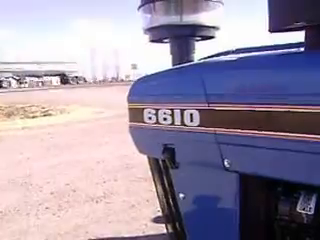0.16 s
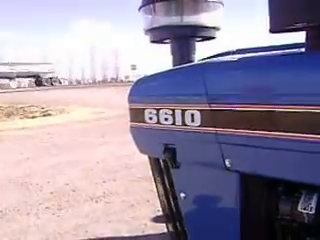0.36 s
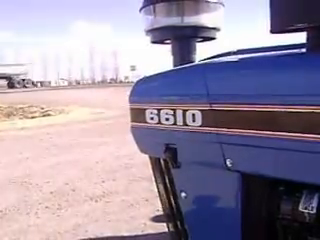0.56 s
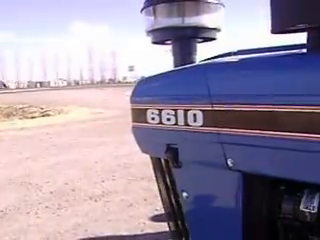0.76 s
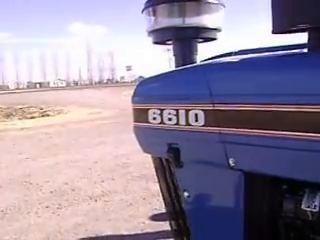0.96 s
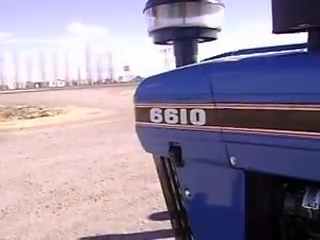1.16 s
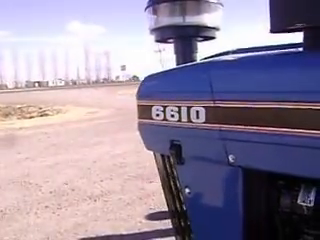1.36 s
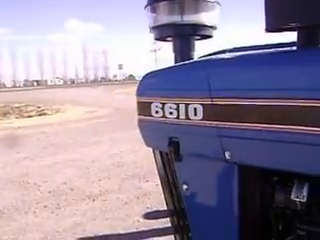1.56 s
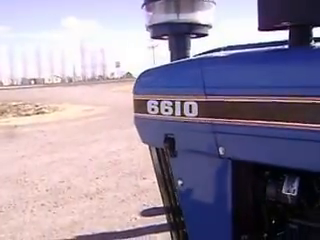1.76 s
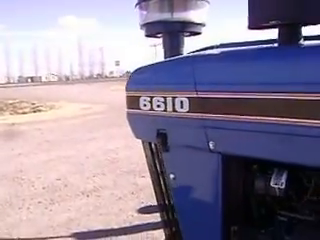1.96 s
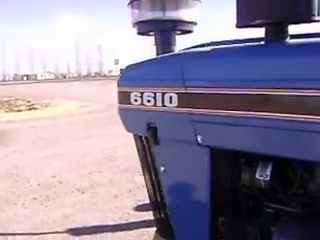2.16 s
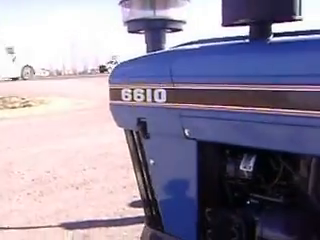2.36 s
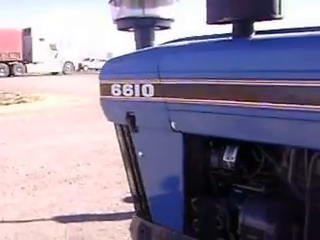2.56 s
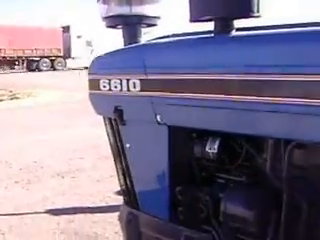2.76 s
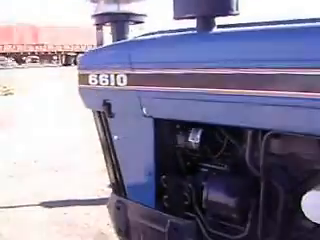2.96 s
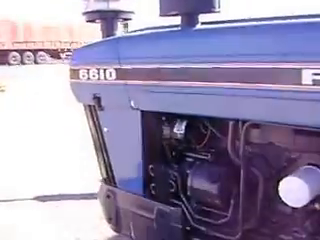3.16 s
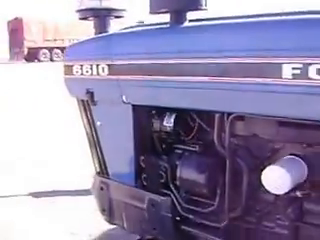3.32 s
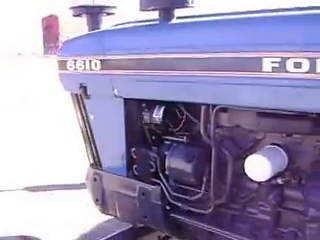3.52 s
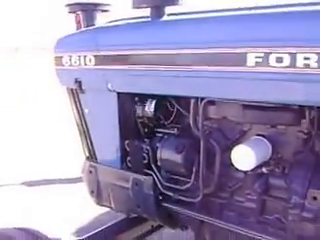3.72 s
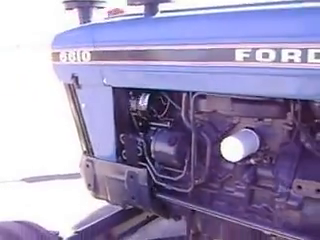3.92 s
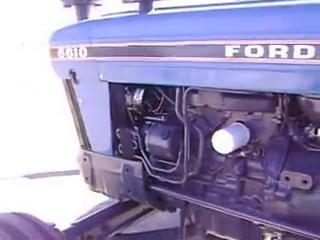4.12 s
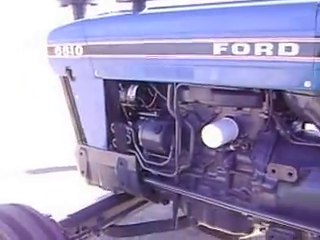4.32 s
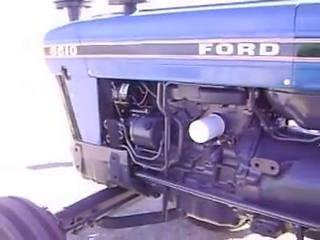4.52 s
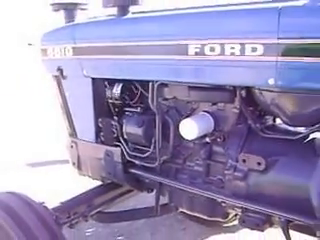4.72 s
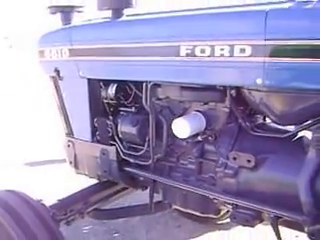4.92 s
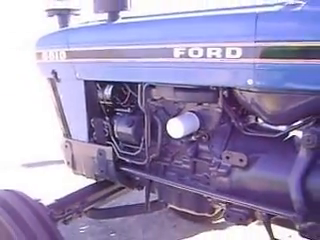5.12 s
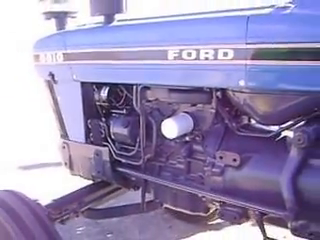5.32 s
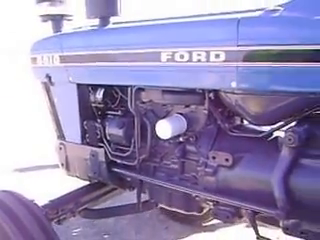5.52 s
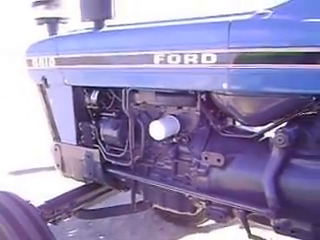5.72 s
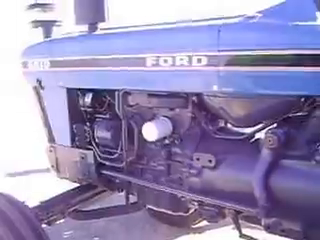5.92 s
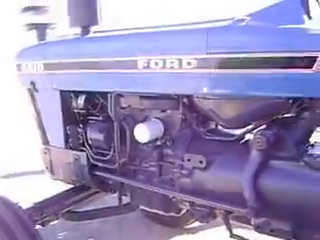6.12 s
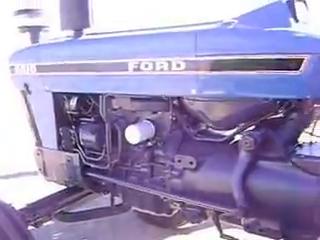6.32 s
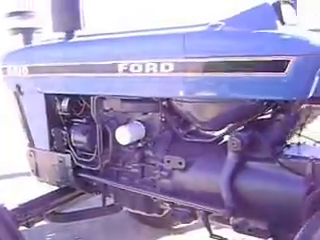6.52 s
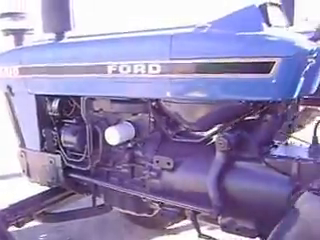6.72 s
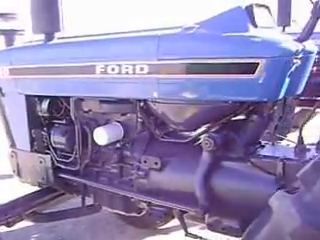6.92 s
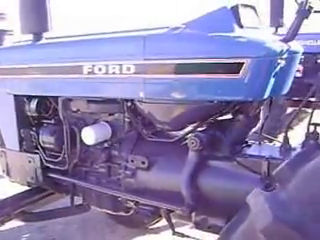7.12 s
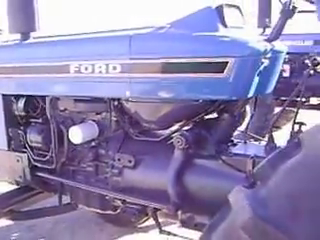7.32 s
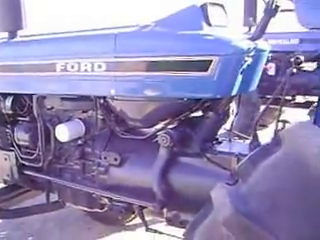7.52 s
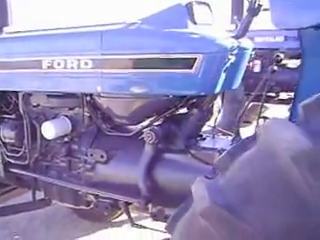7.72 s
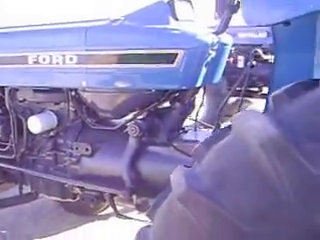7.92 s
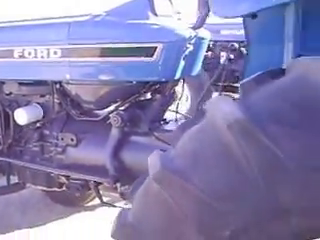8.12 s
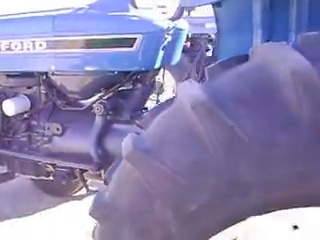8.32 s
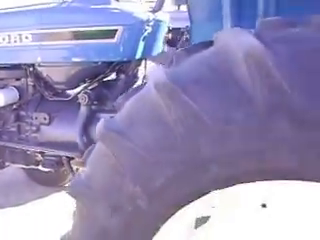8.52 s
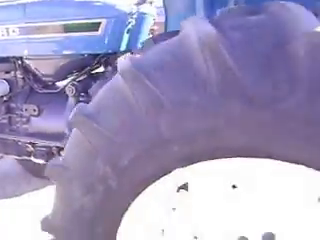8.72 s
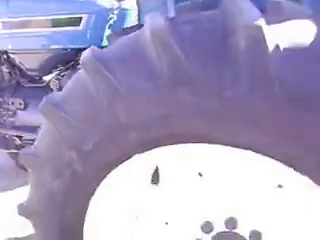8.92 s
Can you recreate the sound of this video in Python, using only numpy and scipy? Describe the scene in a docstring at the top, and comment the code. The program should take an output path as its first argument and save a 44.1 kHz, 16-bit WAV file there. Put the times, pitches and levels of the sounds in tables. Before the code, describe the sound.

Steady diesel drone and tyre roar swell past outdoors, then drop in pitch and fade into windy low rumble and gritty hiss.

```python
"""Diesel truck passing a parked tractor

A diesel truck drones past an open yard at steady speed, its pitch sinking by the Doppler effect.
Exhaust is two harmonics, whines are steady and smeared tones, road noise is filtered noise echoed off a
parked tractor; a fine digital crackle from the recorder rides on its hiss. Low noise makes the wind,
decaying noise sharp ticks. A small, dull camera microphone rounds off the loudest peaks."""
import sys
import numpy as np
from scipy import signal
from scipy.io import wavfile

SR = 44100
rng = np.random.default_rng(int(sys.argv[2]) if len(sys.argv) > 2 else 0)


def unload_wav(signal):
    """Save mono or channel-first audio to the path in sys.argv[1] as 16-bit WAV at rate SR, clipped to [-1, 1]."""
    wavfile.write(
        sys.argv[1],
        SR,
        np.round(np.clip(np.atleast_2d(signal).T, -1, 1) * 32767).astype(np.int16),
    )


N = 399987
TIME = np.arange(N) / SR

FIRING_HZ, SPEED_M_PER_S, SOUND_SPEED_M_PER_S = 91.1, 21.9, 343
CLOSEST_S, CLOSEST_DISTANCE_M = 1.97, 27.4
ROAR_TOP_HZ, HISS_BOTTOM_HZ = 1000, 1450   # roar and hiss levels blend in between
BREEZE_DB = -33   # steady wind, before the gain in wind()
MICROPHONE_TOP_HZ, BAND_EDGE_HZ, CUTOFF_HZ = 5650, 6794, 15800

# Exhaust harmonics: t/s, fundamental level/dB, second harmonic level/dB
EXHAUST_LEVELS = [(0.0, -23, -34), (0.8, -19, -20), (1.1, -19, -30), (1.7, -16, -20), (3.5, -17, -18),
                  (4.0, -21.5, -21), (4.6, -21.5, -21.5), (5.0, -27, -22), (5.8, -28.5, -31),
                  (6.8, -26.5, -51), (7.9, -26, -39.5), (9.07, -27, -33.5)]
# Whines beamed past the yard: multiple of firing rate, peak t/s, half length/s (-3 dB),
# peak level/dB, roughness/0-1
WHINE_TONES = [(2.35, 2.4, 0.54, -27, 0.6), (2.67, 1.88, 0.29, -18.5, 0.21), (3.33, 1.2, 1.0, -23, 0.04),
               (3.47, 1.9, 0.55, -20, 0.8), (3.4, 4.4, 0.9, -25.5, 1), (3.671, 0.95, 0.38, -25, 0.4),
               (4.45, 1.1, 0.54, -21.5, 0.6), (4.37, 2.11, 0.3, -20.5, 0), (4.352, 3.54, 0.71, -19, 0.25),
               (4.351, 5.47, .42, -24.5, 0.5), (5.329, 3.0, 0.25, -19.5, 0),
               (5.331, 4.67, 0.6, -25.5, 0.03), (6.331, 0.48, 0.49, -27, 0.2),
               (6.355, 2.5, 0.44, -25.5, 0.5), (6.998, 0.18, 0.91, -31.5, 0), (7.842, 3.57, 0.92, -24, 0.5),
               (7.998, 3.7, 0.6, -23, 0.5), (8.8, 1.89, 0.54, -17, 0.7)]
# Road noise course; road_noise() keeps only its shape: t/s, roar level/dB, hiss level/dB
ROAD_LEVELS = [(0.0, -21, -29), (1.15, -18.5, -29), (1.95, -14.5, -28.5), (2.7, -16.5, -29),
               (3.58, -15, -29.5), (3.76, -19.5, -34), (4.25, -20, -37), (5.4, -22, -41), (5.6, -29, -45.5),
               (7.65, -30, -48), (8.35, -35.5, -55), (9.07, -35, -51)]
# Road noise spectrum: f/Hz, relative density/dB per Hz
ROAD_SPECTRUM = [(110, -7.5), (200, -1), (320, -1), (520, -2), (750, -0.5), (1000, -4), (1300, -10.5),
                 (1600, -12), (2100, -13.5), (2700, -20), (3800, -23), (5000, -31), (6300, -53)]
# Brief swells and one dip of road noise: peak t/s, rise/s, fall/s, lift/dB, centre f/Hz, width/octaves
ROAD_SWELLS = [(0.2, 0.34, 0.25, 1.5, 1080, .3), (1.85, 0.48, .28, -6.5, 1420, 0.21),
               (2.33, 0.078, 0.043, 3.5, 2800, 1.1), (2.6, .1, .06, 3.5, 1150, 1.5),
               (3.151, 0.12, 0.074, 3, 1500, 1.3), (3.59, 0.059, 0.036, 3.5, 1700, .9),
               (4.38, 0.026, 0.044, 3.5, 3000, 0.82), (4.61, .07, 0.021, 6, 1700, 1.6),
               (4.99, 0.17, 0.23, 4.5, 1700, .5), (6.079, .16, 0.15, 4.5, 1500, 1.1),
               (6.3, .5, .7, 4, 760, .25), (7.149, 0.061, 0.028, 4.5, 2800, 1.1),
               (7.5, 0.22, 0.19, 9, 410, .45), (7.73, .07, .018, 6.5, 1200, 2.1),
               (7.96, .025, 0.086, 9.5, 420, 1.2), (8.501, 0.024, 0.032, 9, 400, 0.98),
               (8.86, .07, .22, 9.5, 420, .9)]
# Echoes off the tractor's bonnet, then its rear wheel: strongest t/s, half length/s, lag/ms, strength/0-1
TRACTOR_ECHOES = [(1.692, 0.97, 0.975, 0.19), (8.2, 0.45, 2.1, 0.1)]
# Ticks: onset t/s, onset level/dB, low f/Hz, high f/Hz, 60 dB decay/s
TICK_EVENTS = [(0.7708, -13.5, 1000, 5200, 0.019), (0.77, -4.5, 540, 1200, 0.035),
               (1.595, -15, 980, 4500, 0.03), (3.2434, -10.5, 3630, 6000, 0.05),
               (4.192, -21, 800, 5500, 0.014), (4.351, -24, 696, 5000, 0.023),
               (4.892, -17, 1200, 3800, 0.022), (8.201, -33, 890, 4000, 0.018),
               (8.221, -27, 700, 4450, 0.01)]
# Gusts, before the gain in wind(): peak t/s, half length/s, level/dB
WIND_GUSTS = [(1.3, 0.2, -22.5), (2.092, 1.3, -29.5), (2.204, 0.053, -30), (3.09, 0.23, -18.5),
              (3.55, 0.11, -20), (4.197, 0.078, -18.5), (4.55, 0.12, -21), (5.043, 0.25, -23.5),
              (6.5, 0.072, -30), (7.7, .15, -33.5), (8.397, 0.48, -37)]
# Wind spectrum: f/Hz, relative density/dB per Hz
WIND_SPECTRUM = [(20, -11), (35, 1.5), (65, -1), (110, -0.5), (160, -4), (250, -11), (500, -32)]
# Dull buffets: peak t/s, level/dB, half length/s, top f/Hz
WIND_BUFFETS = [(4.23, -16, 0.02, 180), (4.548, -16.5, 0.014, 220), (5.03, -16, 0.012, 221),
                (6.65, -22, 0.012, 400), (8.165, -17.5, 0.0087, 468), (8.488, -20.5, 0.0057, 620)]
# Recorder's digital crackle, following the hiss level: t/s, power weight/0-1
CRACKLE_WEIGHT = [(0, 0.28), (3.4, 0.38), (4.2, 0.42), (5.6, 0.67), (9.07, 0.63)]


def doppler_hz():
    """Firing rate as heard: high while the truck nears, low as it leaves."""
    along_m = SPEED_M_PER_S * (TIME - CLOSEST_S)
    receding_m_per_s = SPEED_M_PER_S * along_m / np.hypot(along_m, CLOSEST_DISTANCE_M)
    return FIRING_HZ / (1 + receding_m_per_s / SOUND_SPEED_M_PER_S)


def exhaust(phase, first_db, second_db, flutter_db=0.5):
    """The muffler leaves two clean harmonics of the firing rate."""
    first = from_db(first_db + flutter_db * drift(12)) * np.sin(phase)
    second = from_db(second_db + flutter_db * drift(8)) * np.sin(2 * phase)
    return np.sqrt(2) * (first + second)


def whines(phase, smear=0.031):
    """Engine orders and tread tones share the Doppler glide; rough parts are smeared around their lines."""
    out = np.zeros(N)
    for multiple, peak_s, half_s, level_db, rough in WHINE_TONES:
        rough = np.clip(rough, 0, 1)
        width_hz = smear * multiple * FIRING_HZ
        cosine, sine = np.cos(multiple * phase), np.sin(multiple * phase)
        steady = np.sqrt(2 * (1 - rough)) * cosine
        smeared = np.sqrt(rough) * (drift(width_hz) * cosine + drift(width_hz) * sine)
        envelope = 1 / np.sqrt(1 + ((TIME - peak_s) / half_s) ** 4)
        out += from_db(level_db) * envelope * (steady + smeared)
    return out


def road_noise(phase, sway_db=0.74, flicker_db=0.7, grain_db=3.0, grain_above_hz=2000, throb_db=1.0):
    """Rumble, tyre roar and hiss throb slightly with the firing; the treble is grainy."""
    sway, grain = drift(17), drift(170)
    shared_db = sway_db * sway + throb_db * np.cos(phase)
    centres_hz, noises = zip(*bands(ROAD_SPECTRUM, count=24))
    out = np.zeros(N)
    for hz, noise, level_db in zip(centres_hz, noises, road_levels_db(np.array(centres_hz))):
        course = rms_one(from_db(level_db))   # the spectrum table alone sets the band balance
        band_grain_db = grain_db * hz ** 2 / (hz ** 2 + grain_above_hz ** 2)
        wobble_db = shared_db + flicker_db * drift(10) + band_grain_db * grain
        out += noise * course * from_db(wobble_db)
    return from_db(-15.5) * out


def road_levels_db(hz):
    """Course at each frequency: roar below, hiss above, plus the swells near it."""
    roar_db, hiss_db = in_time(ROAD_LEVELS)
    hiss_share = np.interp(np.log(hz), np.log([ROAR_TOP_HZ, HISS_BOTTOM_HZ]), [0, 1])[:, None]
    lifts_db = np.array([db * np.exp(-0.5 * (np.log2(hz / centre_hz) / octaves) ** 2)
                         for *_, db, centre_hz, octaves in ROAD_SWELLS])
    shapes = np.array([bell(peak_s, rise_s, fall_s) for peak_s, rise_s, fall_s, *_ in ROAD_SWELLS])
    return (1 - hiss_share) * roar_db + hiss_share * hiss_db + lifts_db.T @ shapes


def tractor_echoes(x, slide_ms_per_s=0.067):
    """Reflections a millisecond or two late comb the sound; the comb slides as the source moves."""
    for peak_s, half_s, lag_ms, peak in TRACTOR_ECHOES:
        strength = peak * bell(peak_s, half_s)
        sliding_lag_ms = lag_ms - slide_ms_per_s * (TIME - peak_s)
        echo = np.interp(TIME - sliding_lag_ms / 1000, TIME, x)
        x = (x + strength * echo) / np.sqrt(1 + strength ** 2)
    return x


def ticks():
    """Sharp cracks: band noise with sudden onset and fast exponential decay."""
    out = np.zeros(N)
    for onset_s, level_db, low_hz, high_hz, t60_s in TICK_EVENTS:
        age_s = np.clip(TIME - onset_s, 0, 1)
        out += (TIME >= onset_s) * from_db(level_db - 60 * age_s / t60_s) * band_noise(low_hz, high_hz)
    return out


def wind(lump_db=2.5, gain_db=1.9):
    """Lumpy low noise from breeze and gusts on the microphone, plus short buffets."""
    gust_power = sum((from_db(db) * bell(peak_s, half_s)) ** 2 for peak_s, half_s, db in WIND_GUSTS)
    force = np.sqrt(from_db(BREEZE_DB) ** 2 + gust_power)
    rumble = sum(noise for _, noise in bands(WIND_SPECTRUM, count=9))
    out = rumble * force * from_db(gain_db + lump_db * drift(16))
    for peak_s, level_db, half_s, top_hz in WIND_BUFFETS:
        out += from_db(level_db) * band_noise(90, top_hz) * bell(peak_s, half_s)
    return out


def recorder_crackle(per_s=480, spread_db=4.0, clump_db=0.5, gain_db=4.0, low_hz=1700, high_hz=5700):
    """Fine dry digital crackle of the recorder, following the hiss: random clicks of either sign."""
    born = rng.random(N) < per_s / SR
    size_db = spread_db * np.minimum(rng.exponential(1, N), 3) + clump_db * drift(35)
    clicks = born * from_db(size_db) * rng.choice([-1, 1], N)
    sos = signal.butter(2, [low_hz, high_hz], "band", fs=SR, output="sos")
    filtered = rms_one(signal.sosfilt(sos, clicks + 1e-18))
    hiss_db, = road_levels_db(np.sqrt([low_hz * high_hz]))
    weight = np.clip(in_time(CRACKLE_WEIGHT)[0], 0, 0.95)
    return from_db(hiss_db + gain_db) * np.sqrt(weight) * filtered


def from_db(db):
    """Decibels to gain."""
    return 10 ** (np.asarray(db) / 20)


def rms_one(x):
    """Scale to unit power."""
    return x / np.sqrt(np.mean(x ** 2) + 1e-20)


def in_time(rows):
    """Interpolate each column of a time table to every sample."""
    s, *columns = np.transpose(rows)
    return [np.interp(TIME, s, column) for column in columns]


def at_hz(points, hz):
    """Read a spectrum on a log-frequency axis."""
    table_hz, table_db = np.array(points).T
    return np.interp(np.log(hz), np.log(table_hz), table_db)


def bell(peak_s, rise_s, fall_s=None):
    """Gaussian of height 1, symmetric unless the fall is given."""
    half_s = rise_s if fall_s is None else np.where(TIME < peak_s, rise_s, fall_s)
    return np.exp(-0.5 * ((TIME - peak_s) / half_s) ** 2)


def drift(rate_hz):
    """Random wander of unit power: noise through a two-pole low-pass at SR / 20, interpolated."""
    pole = np.exp(-2 * np.pi * rate_hz * 20 / SR)
    noise = rng.standard_normal(N // 20 + 4002)
    slow = signal.lfilter([1], [1, -2 * pole, pole * pole], noise)[4000:]   # drop the settling
    return np.interp(np.arange(N) / 20, np.arange(len(slow)), rms_one(slow))


def band_noise(low_hz, high_hz):
    """Noise between two frequencies, unit power."""
    sos = signal.butter(2, [low_hz, min(high_hz, 0.45 * SR)], "band", fs=SR, output="sos")
    return rms_one(signal.sosfilt(sos, rng.standard_normal(N + SR))[SR:])


def bands(spectrum, count):
    """Centres and noises of a filter bank that follows the spectrum, unit power in all."""
    edges_hz = np.geomspace(spectrum[0][0], spectrum[-1][0], count + 1)
    centres_hz = np.sqrt(edges_hz[1:] * edges_hz[:-1])
    gains = from_db(at_hz(spectrum, centres_hz)) * np.sqrt(np.diff(edges_hz))
    gains = gains / np.linalg.norm(gains)
    return [(hz, gain * band_noise(low_hz, high_hz))
            for hz, gain, low_hz, high_hz in zip(centres_hz, gains, edges_hz, edges_hz[1:])]


def scene():
    """Passing diesel, ticks, wind and the recorder's crackle at one microphone."""
    phase = 2 * np.pi * np.cumsum(doppler_hz()) / SR
    # the crackle follows the road noise through the same comb
    road_and_crackle = tractor_echoes(road_noise(phase) + recorder_crackle())
    tones = exhaust(phase, *in_time(EXHAUST_LEVELS)) + whines(phase)
    return (tones + road_and_crackle + ticks() + wind())[None]


def record(dry, ceiling=1.0, knee=9.1):
    """The camera passes a narrow band; overload rounds off the highest peaks."""
    dull = signal.sosfilt(signal.butter(12, MICROPHONE_TOP_HZ, fs=SR, output="sos"), dry)
    narrow = signal.sosfilt(signal.ellip(10, 0.1, 70, BAND_EDGE_HZ, fs=SR, output="sos"), dull)
    rounded = ceiling * np.sign(narrow) * np.tanh(np.abs(narrow / ceiling) ** knee) ** (1 / knee)
    return signal.sosfilt(signal.ellip(10, 0.1, 80, CUTOFF_HZ, fs=SR, output="sos"), rounded)


dry = scene()
out = record(dry)
unload_wav(out)
```